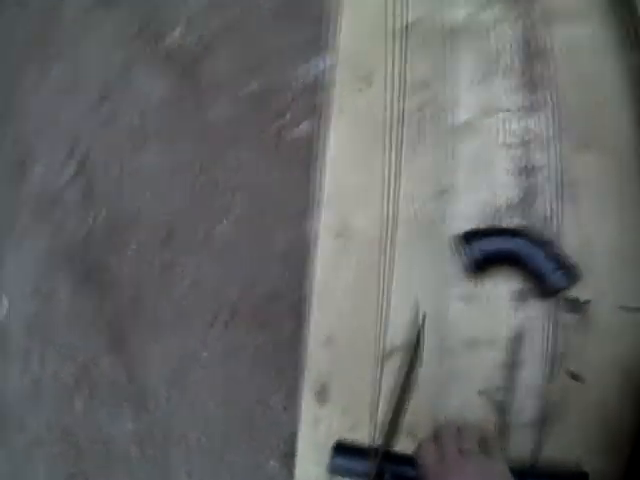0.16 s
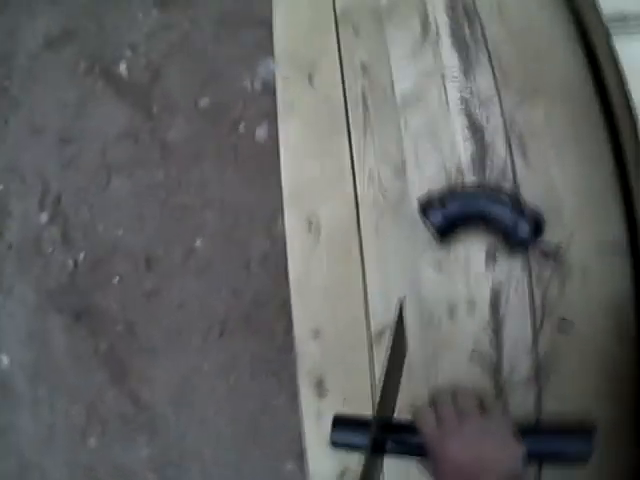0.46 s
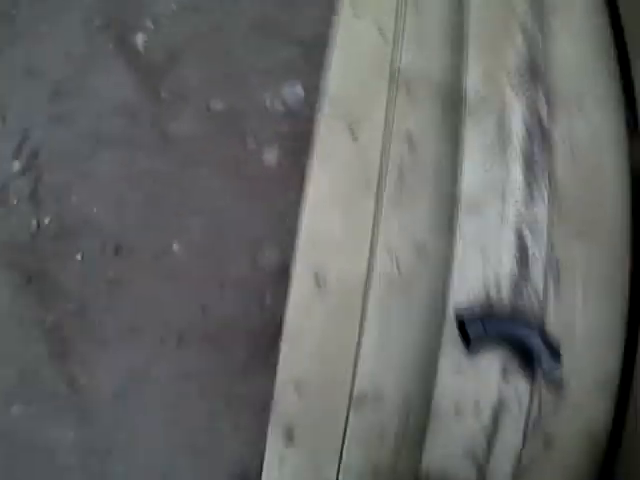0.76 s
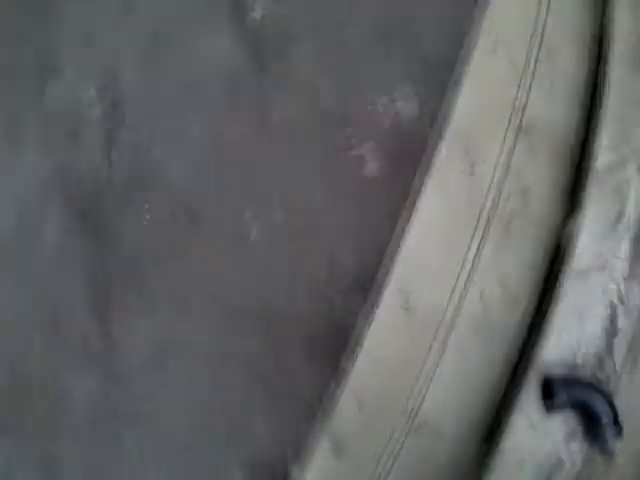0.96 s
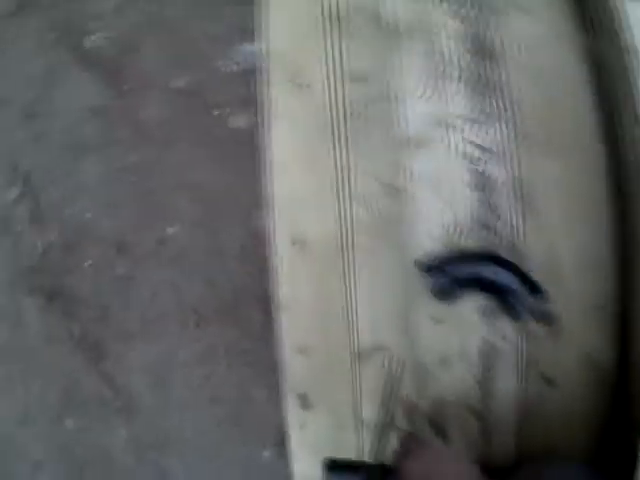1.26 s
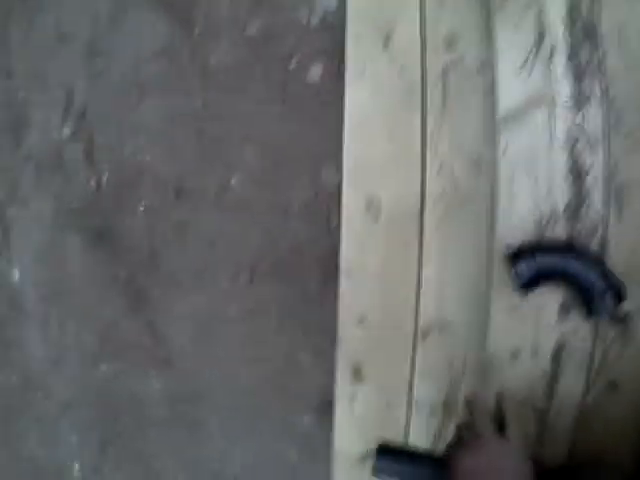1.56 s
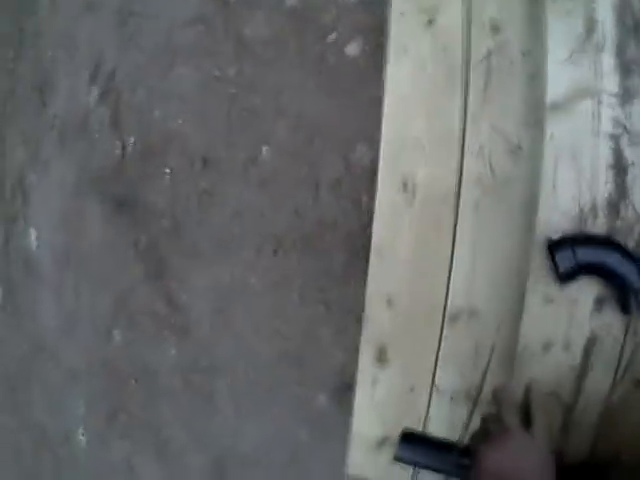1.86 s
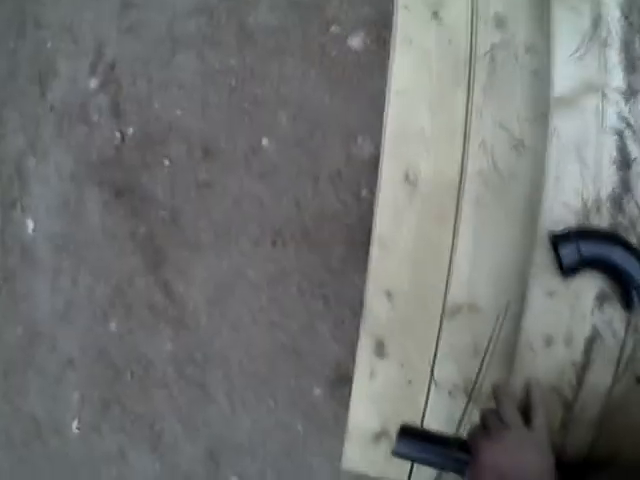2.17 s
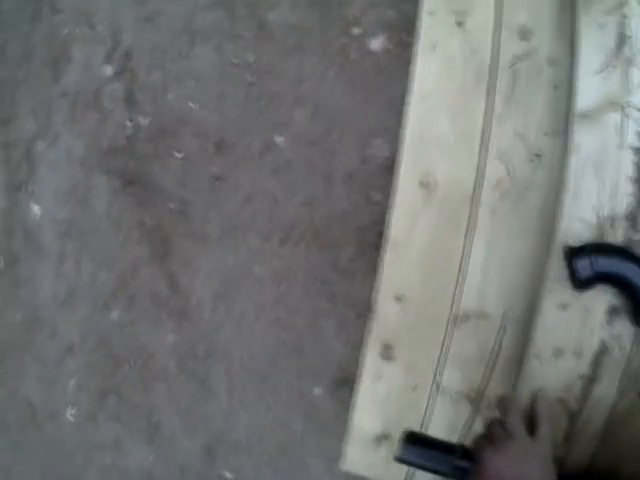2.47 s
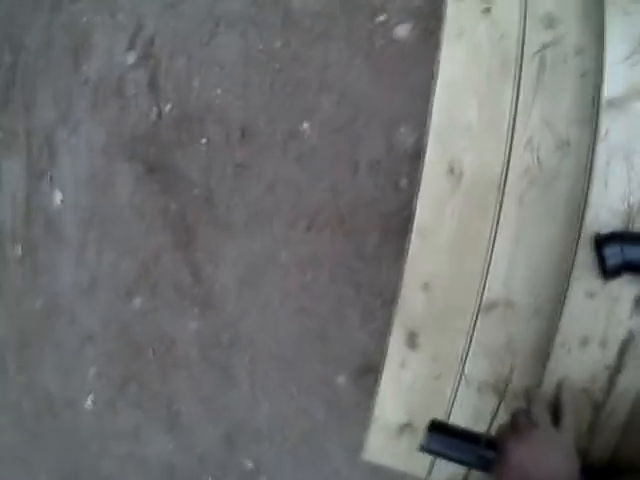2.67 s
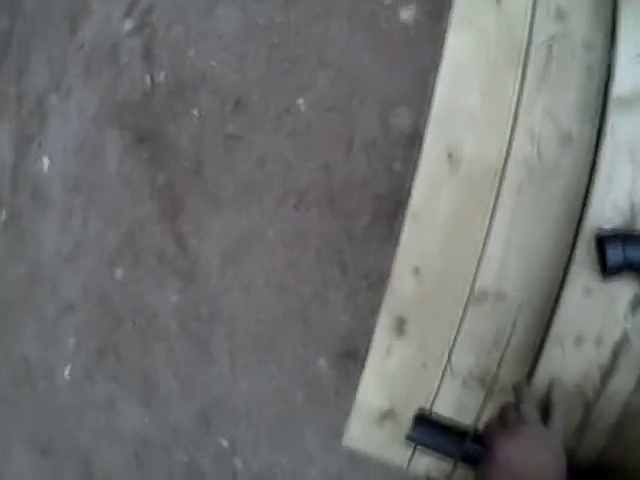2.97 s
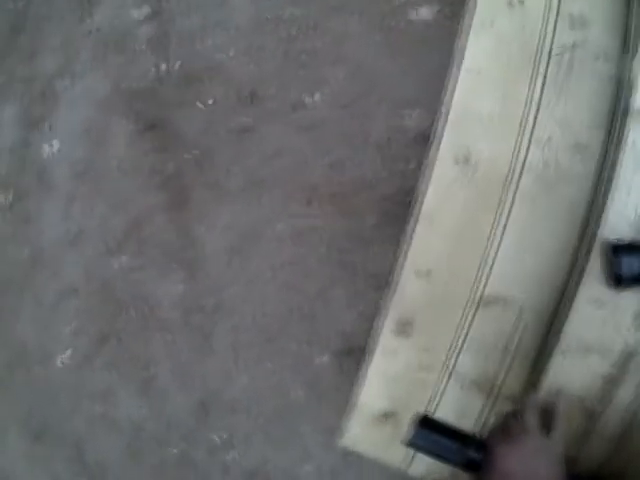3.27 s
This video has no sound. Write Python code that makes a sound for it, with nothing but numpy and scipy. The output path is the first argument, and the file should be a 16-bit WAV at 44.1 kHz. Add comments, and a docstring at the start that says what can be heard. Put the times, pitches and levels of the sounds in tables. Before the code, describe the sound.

A hand saw scratches a plastic pipe a few times, grazes softly for a moment, then rasps quickly back and forth, growing louder. The pipe thrums hollowly over a low rumble, heard close up in a workshop.

```python
"""Sawing a plastic pipe by hand

A hand saw cuts a plastic pipe held on a wooden board in a workshop: a few starting scratches, a lull
in which the blade only grazes, then fast strokes that bite deeper and deeper. The teeth rasp through
the plastic and shake the pipe at their own rate; the moving arm stirs a low rumble."""
import sys
import numpy as np
from scipy import signal
from scipy.fft import rfft, irfft, next_fast_len
from scipy.io import wavfile
from scipy.ndimage import uniform_filter1d

SR = 44100
rng = np.random.default_rng(int(sys.argv[2]) if len(sys.argv) > 2 else 0)


def persist_wave(psi):
    """Save psi, clipped to +-1, as 16-bit WAV."""
    counts = np.round(np.clip(psi, -1, 1) * 32767).astype(np.int16)
    wavfile.write(sys.argv[1], SR, np.atleast_2d(counts).T)


N = 149940
TIME = np.arange(N) / SR
TAIL = 2048  # samples allowed for a filter to ring out
# Pitches at which the blade and the pipe wall ring: f/Hz, width/Hz, boost/dB
RESONANCES = [(1440, 110, 9), (2620, 90, 3), (2950, 130, 3), (4088, 55, 6), (4570, 110, 6), (7485, 90, 5),
              (7860, 90, 5), (8157, 110, 3)]


def amp(db):
    """Turns decibels into a gain to multiply by."""
    return 10 ** (np.asarray(db) / 20)


def unit(x):
    """Scales a signal to an average (rms) level of 1."""
    return x / np.sqrt(np.mean(x ** 2) + 1e-20)


def gain_at(colour, hz):
    """Reads gains from a colour: a table of how strong each frequency is (f/Hz, level/dB)."""
    f, db = np.transpose(colour)
    return amp(np.interp(np.log(hz + 1), np.log(f + 1), db))


def tinted(x, colour):
    """Filters a sound to give it a colour."""
    padded = next_fast_len(len(x) + TAIL)
    gain = gain_at(colour, np.fft.rfftfreq(padded, 1 / SR))
    return irfft(rfft(x, padded) * gain, padded)[:len(x)]


def noise(colour):
    """Coloured noise with an average level of 1."""
    return unit(tinted(rng.standard_normal(N), colour))


def add(mix, start, sound):
    """Mixes a sound in at a start time in seconds."""
    part = mix[max(round(start * SR), 0):][:len(sound)]
    part += sound[:len(part)]


def body(colour, resonances, pitch=1):
    """How an object answers one tap: a broad colour with ringing peaks on top."""
    hz = np.fft.rfftfreq(4 * TAIL, 1 / SR) / pitch
    peaks = sum(abs(amp(2 * db) - 1) / (1 + (2 * (hz - f) / width) ** 2) for f, width, db in resonances)
    gain = gain_at(colour, hz) * np.sqrt(1 + peaks)
    log_gain = np.log(np.r_[gain, gain[-2:0:-1]])
    spectrum = np.exp(np.conj(signal.hilbert(log_gain)))  # puts all ringing after the tap
    return np.fft.ifft(spectrum).real[:TAIL]


def excite(force, response, db):
    """A force sets a body ringing, scaled to the given level."""
    sound = signal.fftconvolve(force, response)
    return amp(db) * sound * np.sqrt(len(force) / np.sum(sound ** 2))


def air_rumble():
    """The moving arm stirs the air into a slow, deep sway."""
    # Loudness of the sway: t/s, level/dB
    loudness = [(0, -33), (1.0, -33), (1.28, -39.5), (1.6, -32.5), (2.6, -30.5), (3.4, -23.5)]
    # Its colour: f/Hz, level/dB
    colour = [(15, -0.5), (38, -27.5), (70, -35.5), (170, -31.5), (900, -81)]
    return amp(np.interp(TIME, *np.transpose(loudness))) * noise(colour)


def background():
    """The workshop's faint, steady noise."""
    # Its colour: f/Hz, level/dB
    colour = [(30, 20), (200, 1), (550, 11.5), (900, -1.5), (8000, -7), (16000, -35)]
    return amp(-53) * noise(colour)


def stroke(length, fastest, tooth_hz, levels_db, bodies, *,
           rasp_power, thrum_power, growth, tooth_depth, catch_db, jitter, roughness, overtone):
    """The blade speeds up and slows; teeth tear chips at a rate that follows speed and shake the pipe."""
    progress = np.arange(0, 1, 1 / (length * SR))
    wobble, catches, fizz, grit, shake = rng.standard_normal((5, 4 * TAIL))[:, :len(progress)]
    travel = np.interp(progress, [0, np.clip(fastest, .1, .9), 1], [0, .5, 1])
    speed = abs(np.sin(np.pi * travel))
    unevenness = 1 + jitter * unit(uniform_filter1d(wobble, size=80))
    teeth_passed = np.cumsum(tooth_hz * speed ** 0.713 * unevenness) / SR
    tooth_wave = np.cos(2 * np.pi * teeth_passed)
    # Each tooth catches with its own random strength.
    catch = amp(catch_db * np.tanh(np.interp(teeth_passed, np.arange(len(progress)), catches)))
    tearing = catch * (1 + tooth_depth * tooth_wave) * speed ** rasp_power
    push = tooth_wave + overtone * np.cos(4 * np.pi * teeth_passed)
    push += roughness * unit(uniform_filter1d(shake, size=30))
    push *= catch * speed ** thrum_power * np.exp(growth * progress)
    forces = tearing * fizz, tearing * grit, push  # blade hiss, wall grinding, pipe thrum
    return sum(excite(force, response, db) for force, response, db in zip(forces, bodies, levels_db))


def wall(colour, start):
    """The pipe wall is stiffer and grinds higher while the cut is shallow, then sinks in pitch."""
    extra_pitch, settled_s = 0.1, 1.55
    shallowness = np.clip(2 * (1 - start / settled_s), 0, 1)
    return body(colour, RESONANCES, pitch=1 + extra_pitch * shallowness)


def saw():
    """Biting strokes shake the pipe most in their second half; return strokes slide more evenly."""
    # Strokes against the teeth: start/s, length/s, top tooth rate/Hz, hiss/dB, grinding/dB, thrum/dB
    bites = [(0.047, 0.068, 312, -45, -44.5, -35.5), (0.094, 0.11, 281.2, -42.5, -42.5, -32.5),
             (0.26, 0.076, 303, -34, -37, -27), (0.43, 0.056, 279.6, -33, -38.5, -27),
             (1.403, 0.089, 343.4, -35, -36, -27.5), (1.561, 0.076, 384.5, -36.5, -35.5, -28.5),
             (1.693, 0.085, 378, -33, -34.5, -31), (1.84, 0.07, 435, -32, -34, -32.5),
             (1.981, 0.069, 411.5, -29, -33, -26), (2.12, 0.072, 413.3, -28.5, -30, -21),
             (2.259, 0.075, 470.7, -28, -28, -20), (2.401, 0.062, 436, -25, -24, -18),
             (2.545, 0.0489, 485, -25.5, -23.5, -18.5), (2.676, 0.07, 524.4, -26, -22.5, -19.5),
             (2.82, 0.069, 540, -21, -20.5, -19.5), (2.957, 0.07, 575.4, -21, -19.5, -21.5),
             (3.097, 0.064, 618, -23, -19, -16.5), (3.231, 0.072, 638.4, -21, -19.5, -21),
             (3.367, 0.074, 624, -24.5, -19, -19)]
    # Strokes sliding back: start/s, moment of top speed/share of stroke, hiss/dB, grinding/dB, thrum/dB
    returns = [(0.192, 0.47, -28, -32.5, -34), (0.352, 0.4, -41, -45, -41), (1.336, 0.4, -41.5, -42, -37.5),
               (1.494, 0.52, -34, -36, -36), (1.636, 0.36, -29, -32, -44), (1.776, 0.44, -28, -31.5, -38),
               (1.909, 0.39, -26.5, -30.0, -36), (2.051, 0.37, -26.5, -31, -39),
               (2.187, 0.39, -25, -29.5, -34.5), (2.328, 0.35, -26.5, -28, -37),
               (2.467, 0.34, -28, -29, -34.5), (2.606, 0.31, -32, -31, -33),
               (2.752, 0.28, -30.5, -29.5, -30.5), (2.889, 0.18, -32.5, -29.0, -31.5),
               (3.026, 0.47, -31, -30.5, -30), (3.164, 0.28, -31.5, -31.5, -29.5),
               (3.302, 0.3, -30, -28, -28)]
    # Colours of the blade's hiss and of the grinding in each direction: f/Hz, level/dB
    hiss = [(3000, -19), (4800, -3.5), (5600, 0), (6700, 1), (7400, 7), (8300, 8.5), (8700, 0),
            (16000, -26.5)]
    bite_grind = [(300, -27.5), (650, -0.5), (900, -2.5), (1400, 0), (1800, 2.5), (2200, 0), (2800, -1),
                  (3600, -1.5), (4900, -8), (7000, -2), (9000, -49)]
    return_grind = [(300, 4), (650, 4), (1000, -0.5), (1450, 8), (2100, 5), (2950, 9.5), (3700, 1.5),
                    (4600, 0), (6000, -13)]
    # Colour of the pipe held on its board: f/Hz, level/dB
    pipe_colour = [(30, -8.5), (120, -4), (200, -8.5), (280, -5), (450, -5), (600, -7.5), (800, -21),
                   (1500, -17), (4000, -45)]
    # Pitches at which the held pipe rings: f/Hz, width/Hz, boost/dB
    pipe_resonances = [(273, 74, 6.2), (315, 41, 2.1), (406.4, 9.3, 5.1), (459, 21, 5.7), (612, 45, 3.65)]
    blade, pipe = body(hiss, RESONANCES), body(pipe_colour, pipe_resonances)
    out = np.zeros(N)
    for start, length, tooth_hz, *levels_db in bites:
        add(out, start, stroke(
            length, fastest=0.4717, tooth_hz=tooth_hz, levels_db=levels_db,
            bodies=(blade, wall(bite_grind, start), pipe), rasp_power=1.69, thrum_power=1.64,
            growth=1.59, tooth_depth=0.057, catch_db=2.5, jitter=0.065, roughness=0.63, overtone=0.49))
    for start, fastest, *levels_db in returns:
        add(out, start, stroke(
            length=0.083, fastest=fastest, tooth_hz=467.7, levels_db=levels_db,
            bodies=(blade, wall(return_grind, start), pipe), rasp_power=1.79, thrum_power=0.39,
            growth=0.033, tooth_depth=0.052, catch_db=0.5, jitter=0.239, roughness=3.4, overtone=0.34))
    return out


def board_shudder(sawing):
    """The board shakes as hard as the saw works."""
    # Colour of the shaking: f/Hz, level/dB
    colour = [(20, -4), (58, 8), (90, -10), (160, -13.5), (600, -53)]
    effort = np.sqrt(abs(uniform_filter1d(sawing ** 2, size=5000)))
    return amp(-11.5) * effort * noise(colour)


def scuffs():
    """The blade skids before it finds a groove and sets the pipe ringing hollowly."""
    # Skids: start/s, length/s, ring/Hz, level/dB
    skids = [(0.099, 0.058, 420, -37), (0.627, .042, 367, -41.5), (0.762, 0.053, 417, -42.5),
             (0.871, .05, 465, -43)]
    # Their colour: f/Hz, level/dB
    colour = [(150, -2.5), (500, -5.5), (1350, 2), (2400, -8.5), (8000, -21)]
    width_hz, boost_db = 140, 19
    out = np.zeros(N)
    for start, length, hz, db in skids:
        progress = np.arange(0, 1, 1 / (length * SR))
        friction = rng.standard_normal(4 * TAIL)[:len(progress)] * np.sin(np.pi * progress)
        add(out, start, excite(friction, body(colour, [(hz, width_hz, boost_db)]), db))
    return out


def judders():
    """The slowing blade sticks and slips; the pipe hums up and dies away within a few cycles."""
    # Moments when the blade sticks: t/s, f/Hz, peak/dB
    sticks = [(.288, 258, -19.5), (0.454, 260.2, -14), (0.776, 396, -29.5), (1.45, 315, -36),
              (1.594, 345, -19.5), (2.573, 315, -9.5), (2.713, 280.4, -5.5), (2.862, 289, -8),
              (2.995, 283, -9), (3.139, 280, -7.5)]
    rise_s, fall_s = 0.01, 0.012
    out, t = np.zeros(N), TIME[:2 * TAIL]
    rise = np.sin(np.pi / 2 * np.minimum(t / rise_s, 1))
    fall = np.exp(-np.maximum(t - rise_s, 0) / fall_s)
    for start, hz, db in sticks:
        add(out, start, amp(db) * rise * fall * np.sin(2 * np.pi * (hz * t + rng.random())))
    return out


def grazes():
    """In the lull the blade brushes the pipe in soft swishes."""
    # Swishes: start/s, length/s, peak/dB
    swishes = [(0.678, .14, -44), (0.792, 0.22, -46.5), (0.972, 0.16, -49.5), (1.128, 0.16, -51.5)]
    # Their colour: f/Hz, level/dB
    colour = [(100, 12), (500, 14.5), (1500, 5), (5000, 1.5), (8000, 6.5), (16000, -33)]
    swell = sum(amp(db) * np.sin(np.pi * np.clip((TIME - start) / length, 0, 1))
                for start, length, db in swishes)
    return swell * noise(colour)


def bumps():
    """Handling makes soft bumps, each one smooth pulse."""
    # Bumps: t/s, peak/dB
    pulses = [(0.678, -20), (2.8, -14)]
    width_s = 0.0064
    return sum(amp(db) * np.exp(-.5 * ((TIME - t) / width_s) ** 2) for t, db in pulses)


def rub():
    """The pipe shifts on the board with a soft, hollow rub that sinks in pitch."""
    start_s, length_s, pitch_hz, sag_hz, width_hz = .93, .27, 627, 93, 160
    progress = np.clip((TIME - start_s) / length_s, 0, 1)
    smoothing = signal.butter(2, width_hz / 2, fs=SR, output="sos")
    flutter = unit(signal.sosfilt(smoothing, rng.standard_normal(N)))
    tone = np.cos(2 * np.pi * np.cumsum(pitch_hz - sag_hz * progress) / SR)
    return amp(-44) * np.sin(np.pi * progress) * unit(flutter * tone)


def room_echo(x):
    """The workshop answers with a short, weak echo."""
    rise_s, fade_s = 0.0049, 0.1
    t = TIME[:SR // 2]
    tail = rng.standard_normal(len(t)) * amp(-60 * t / fade_s) * np.minimum(t / rise_s, 1)
    return amp(-14.5) * signal.fftconvolve(x, tail / np.linalg.norm(tail))[:N]


def scene():
    """Mixes all sounds near the centre; close reflections widen the treble a little."""
    # Stereo width: f/Hz, side compared with centre/dB
    width = [(40, -33), (1500, -38), (2600, -19), (9000, -16)]
    sawing = saw() + judders() + scuffs() + grazes() + rub()
    centre = sawing + room_echo(sawing) + air_rumble() + board_shudder(sawing) + bumps() + background()
    scatter = rng.standard_normal(TAIL // 4)
    reflections = signal.fftconvolve(centre, scatter / np.linalg.norm(scatter))[:N]
    side = tinted(reflections, width)
    return np.array([centre + side, centre - side])


def low_pass(x, hz, taps):
    """Steeply cuts everything above a frequency."""
    return signal.oaconvolve(x, signal.firwin(taps, hz, window=("kaiser", 7), fs=SR)[None], "same")


def record(dry):
    """Rounds off peaks and cuts the high treble; faint fizz near 12 kHz remains, broader when loud."""
    # Colour of the faint fizz above the cut: f/Hz, level/dB
    fizz_colour = [(10000, -46.5), (12000, 1), (13000, -57), (16000, -12)]
    ceiling, cut_hz, top_hz = 1.2, 8800, 15800
    rounded = ceiling * np.tanh(dry / ceiling)
    passed = low_pass(rounded, cut_hz, taps=201)
    treble = rounded - passed
    faint_fizz = np.array([tinted(channel, fizz_colour) for channel in treble])
    loudness = np.sqrt(abs(uniform_filter1d(rounded ** 2, size=600)))
    broad_fizz = amp(-1) * loudness * treble
    return low_pass(passed + faint_fizz + broad_fizz, top_hz, taps=511)


dry = scene()
out = record(dry)
persist_wave(out)
```